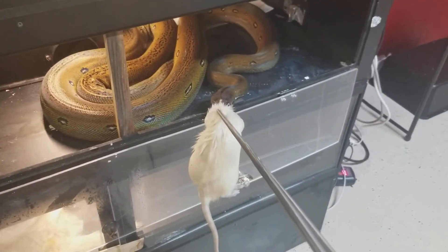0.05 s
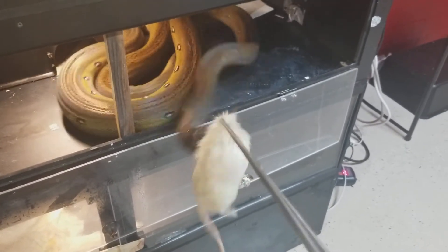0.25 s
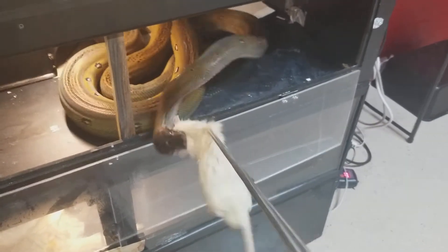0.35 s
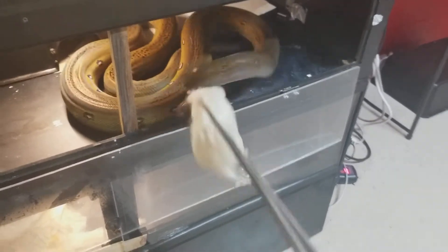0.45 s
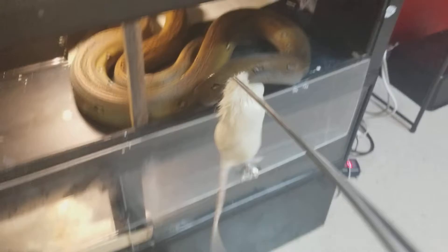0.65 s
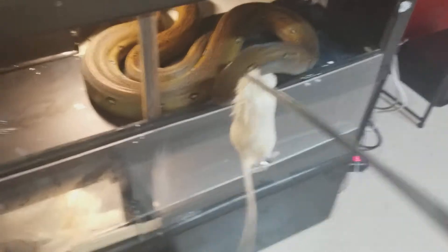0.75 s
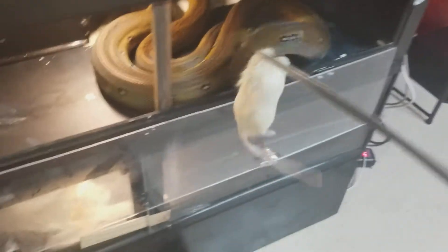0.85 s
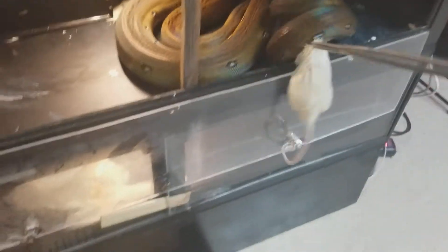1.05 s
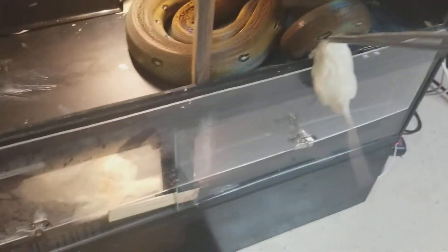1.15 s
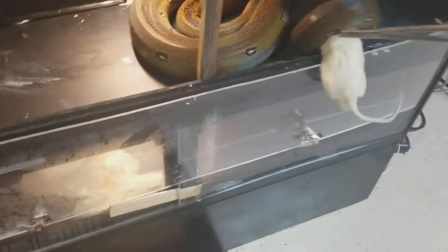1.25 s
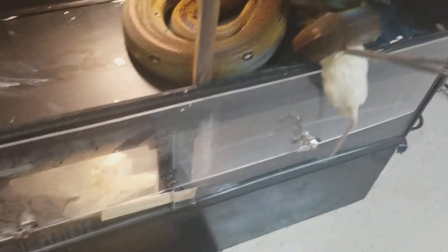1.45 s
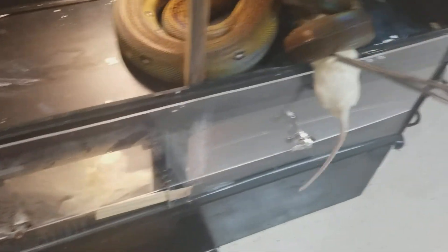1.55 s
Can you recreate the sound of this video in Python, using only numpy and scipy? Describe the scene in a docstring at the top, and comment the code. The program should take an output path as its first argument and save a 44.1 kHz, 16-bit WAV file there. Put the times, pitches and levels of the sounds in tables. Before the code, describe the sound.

A large snake strikes with a snap, then thumps against its enclosure and drags its coils.

```python
"""A python lunges at food held on steel tongs, in a small hard-walled room with a low ventilation rush.
First a swish swells and ends in the snap of its jaws. Its body then hits the panels of its enclosure:
two loud thumps among softer bumps. Meanwhile its coils drag over the floor, and its skin squeaks once.
As the dragging fades, the tongs scrape off the scales and click shut. Last comes a soft tap close by."""
import sys
import numpy as np
from scipy import signal
from scipy.fft import rfft, irfft, next_fast_len
from scipy.io import wavfile

SR = 44100
rng = np.random.default_rng(int(sys.argv[2]) if len(sys.argv) > 2 else 0)


def digitize_waveform(pressure):
    """Quantize a signal to 16-bit integers and store it at the path in sys.argv[1].

    Rows of a 2-D input are taken as channels; values are limited to [-1, 1].
    """
    field = np.atleast_2d(pressure).T
    bounded = np.clip(field, -1, 1)
    quanta = np.round(bounded * 32767).astype(np.int16)
    wavfile.write(sys.argv[1], SR, quanta)


N = 70560

# tones the enclosure panels ring at (pitch [Hz], level [dB], time to fade by 60 dB [s])
PANEL_TONES = [(72.8, -19, 0.43), (135.3, -0.5, 0.35), (166, -6, 0.14), (224.8, -7.5, 0.24), (275, 1, 0.14),
               (352, -4, .2), (384.2, -15.5, 0.41), (462, 0.5, 0.12), (538.3, -14, 0.4), (591, -12.5, .16),
               (773, -6, 0.24), (1124, -10, 0.084)]
# how long the room echoes (frequency [Hz], time to fade by 60 dB [s])
ECHO_TIMES = [(150, 0.7), (800, 0.21), (2500, 0.23), (6000, 0.32), (14000, 0.26)]
DIRECT_DB = 0.5  # gain of the sound that arrives ahead of its echo


def amp(db):
    """Turn decibels into a gain to multiply by."""
    return 10 ** (np.asarray(db) / 20)


def along(points, hz):
    """Read between (frequency, value) points on a logarithmic frequency scale."""
    frequencies, values = np.transpose(points)
    return np.interp(np.log(hz + 1), np.log(frequencies + 1), values)


def colour(points):
    """A tone colour: a gain for any frequency, from (frequency [Hz], level [dB]) points."""
    return lambda hz: amp(along(points, hz))


def resonance(centre_hz, width_hz):
    """A tone colour with a single peak."""
    return lambda hz: 1 / (1 + ((hz - centre_hz) / width_hz) ** 2)


def level(points):
    """A gain for each sample, from (time [s], level [dB]) points."""
    return amp(np.interp(np.arange(N) / SR, *np.transpose(points)))


def since(start_s):
    """Seconds since a moment, zero before it."""
    return np.maximum(np.arange(N) / SR - start_s, 0)


def fade(t, fade_s):
    """Start suddenly, then fall by 60 dB every fade_s seconds."""
    return (t > 0) * np.exp(-np.log(1000) * t / fade_s)


def pan(db):
    """Two gains that make the left side db decibels louder than the right."""
    return amp(np.array([[db], [-db]]) / 2)


def filtered(sound, gain):
    """Turn each frequency of a sound up or down by its gain."""
    size = next_fast_len(N + SR // 2)
    return irfft(rfft(sound, size) * gain(np.fft.rfftfreq(size, 1 / SR)), size)[..., :N]


def spread(pair, gain):
    """Mix two unrelated signals into coloured stereo of strength 1, with the bass near the middle."""
    # how alike left and right are (frequency [Hz], likeness [0 to 1])
    likeness = [(100, 0.96), (250, 0.89), (500, 0.78), (1000, 0.072), (2000, 0.19), (5000, 0), (12000, 0)]
    angle = lambda hz: np.arccos(along(likeness, hz)) / 2
    mid, side = filtered(pair, lambda hz: gain(hz) * np.array([np.cos(angle(hz)), np.sin(angle(hz))]))
    stereo = np.array([mid + side, mid - side])
    return stereo / np.sqrt(np.mean(stereo ** 2) + 1e-20)


def noise(gain):
    """Stereo noise with the given tone colour."""
    return spread(rng.standard_normal((2, N)), gain)


def room(sound, echo_db):
    """A sound plus its echo off the hard walls, each frequency dying at its own speed."""
    hz, t, bands = signal.stft(noise(np.ones_like)[:, :SR // 2], SR, nperseg=256)
    dying = fade(t + 1e-9, along(ECHO_TIMES, hz)[:, None])
    tail = signal.istft(bands * dying, SR, nperseg=256)[1]
    tail *= np.arange(tail.shape[1]) / SR > 0.0022  # the echo starts a moment late
    tail /= np.linalg.norm(tail, axis=1, keepdims=True)
    echo = signal.fftconvolve(np.atleast_2d(sound)[:1], tail, axes=1)[:, :N]
    return amp(DIRECT_DB) * sound + amp(echo_db) * echo


def burst(gain, start_s, fade_s, echo_db):
    """A short noisy contact, and the room echo that builds up as it gives off its energy."""
    t = since(start_s)
    contact = fade(t, fade_s) * (1 - np.exp(-t / 0.00086))  # rises in about a millisecond
    hz, frame_s, bands = signal.stft(noise(gain), SR, nperseg=256)
    echo_s = along(ECHO_TIMES, hz)[:, None]
    dying = np.sqrt(fade_s / echo_s) * fade(np.abs(frame_s - start_s) + 1e-9, echo_s)
    tail = signal.istft(bands * dying, SR, nperseg=256)[1][:, :N]
    build_up = np.sqrt(np.cumsum(contact ** 2) / np.sum(contact ** 2))
    return amp(DIRECT_DB) * contact * noise(gain) + amp(echo_db) * build_up * tail


def ring(tones, t, rise_cycles=1.8):
    """A struck object rings: each tone takes a few cycles to build up, then dies away."""
    sound = np.zeros(N)
    for k, (hz, db, fade_s) in enumerate(tones):
        gain = (-1) ** k * amp(db - 1.5 * rng.standard_normal())  # every other tone is flipped
        rise = 1 - np.exp(-t * hz / rise_cycles)
        sound += gain * rise * fade(t, fade_s) * np.sin(2 * np.pi * hz * t)
    return sound


def ventilation():
    """Moving air makes a steady low rush."""
    # colour of the rush (frequency [Hz], level [dB])
    air_colour = [(25, -15), (65, -3), (105, -10.5), (140, -1), (280, -0.5), (380, -3.5), (460, -1.5),
                  (630, -15.5), (1000, -22), (2400, -31), (7000, -44), (9000, -51), (11500, -44.5),
                  (15500, -32)]
    return amp(-56.5) * noise(colour(air_colour))


def tap(start_s=1.4483, pitch_hz=634, reflection_delay_s=0.0046):
    """Something taps softly close by, and the sound bounces once off a near surface."""
    pulse = lambda t: np.sin(2 * np.pi * pitch_hz * t) * fade(t, fade_s=0.0035)
    reflection = amp(-10) * pulse(since(start_s + reflection_delay_s))
    return amp(-32.5) * (pulse(since(start_s)) + reflection) * pan(-5)


def tongs_scrape():
    """The tongs slip off the scales with a brief bright scrape."""
    # colour of steel sliding on scales (frequency [Hz], level [dB])
    scrape_colour = [(200, -10), (750, 3.5), (1300, -14), (2300, -6), (5300, -5.5), (7200, 5.5), (8800, -2),
                     (11200, 6.5), (12500, -10), (15500, -7)]
    return amp(-46.5) * burst(colour(scrape_colour), start_s=1.199, fade_s=0.16, echo_db=2.5) * pan(4)


def tongs_click(start_s=1.3802):
    """The tips meet with a sharp tick and a clack that rings the steel arms."""
    # colour of the tips meeting (frequency [Hz], level [dB])
    clack_colour = [(900, -17), (1400, -2), (2600, 0), (5000, 0), (7000, -10.5), (15000, -23)]
    # tones of the steel arms (pitch [Hz], level [dB], time to fade by 60 dB [s])
    steel_tones = [(1498, -2.5, 0.057), (2550, 0, 0.061), (3187, -5, 0.072), (4176, 1, 0.036),
                   (5000, -6, 0.054)]
    clack = amp(-47.5) * burst(colour(clack_colour), start_s, fade_s=0.042, echo_db=1)
    tick = amp(-39) * burst(resonance(centre_hz=10430, width_hz=730), start_s, fade_s=0.0074, echo_db=-9)
    arms = amp(-54.5) * room(ring(steel_tones, since(start_s), rise_cycles=2.4), echo_db=1)
    return (clack + tick + arms) * pan(4)


def skin_squeak(peak_s=0.858, rise_s=0.024, fall_s=0.0079):
    """Skin rubs on a panel: a rough squeak swells, then lets go."""
    t = np.arange(N) / SR - peak_s
    swell = np.exp(-np.abs(t) / np.where(t < 0, rise_s, fall_s))
    return amp(-47) * swell * noise(resonance(centre_hz=1250, width_hz=110))


def sliding_scales(colour_points, slips_per_s=3000):
    """Scales slide in many tiny slips of uneven size."""
    slips = (rng.random((2, N)) < slips_per_s / SR) * rng.standard_normal((2, N))
    unevenness = amp(2.5 * rng.standard_normal((2, N)))
    return spread(slips * unevenness, colour(colour_points))


def coils():
    """The body rasps, hisses and squeaks as it slides, while its weight rumbles in the panels."""
    # scales dragging on the floor (time [s], level [dB])
    drag_levels = [(.2, -98), (.222, -45), (.28, -49.5), (.33, -56.5), (.44, -65), (.48, -57), (.56, -58.5),
                   (.62, -53.5), (.7, -59.5), (.73, -48), (.79, -62.5), (.86, -54.5), (.98, -54.5),
                   (1.07, -67), (1.36, -73), (1.47, -65), (1.6, -67)]
    # colour of the dragging (frequency [Hz], level [dB])
    drag_colour = [(200, 5), (500, 9.5), (800, 9.5), (1300, 7), (1700, 5), (2400, 8.5), (3500, 1),
                   (5000, 0.5), (7000, -46), (9000, -25), (15000, -16)]
    drag = level(drag_levels) * sliding_scales(drag_colour)
    # fine hiss of the scales (time [s], level [dB])
    hiss_levels = [(.19, -80), (.222, -43.5), (.3, -55), (.42, -67), (.66, -67), (.705, -59.5), (.725, -51),
                   (.79, -67.5), (.835, -62), (.85, -52), (.89, -59), (.925, -52.5), (1.02, -63),
                   (1.17, -66), (1.35, -73.5), (1.5, -70.5), (1.6, -72)]
    # colour of the hiss (frequency [Hz], level [dB])
    hiss_colour = [(1000, -30), (4000, -2.5), (7200, -1), (9000, -6), (11500, 1.5), (13000, -9.5),
                   (15500, -12)]
    hiss = level(hiss_levels) * sliding_scales(hiss_colour)
    rubbing = room(drag + hiss, echo_db=0) + skin_squeak()
    # weight shifting on the panels (time [s], level [dB])
    rumble_levels = [(.12, -73), (.23, -45.5), (.27, -36.5), (.295, -41), (.4, -36.5), (.47, -47.5),
                     (.53, -36), (.62, -55), (.68, -45.5), (.73, -48), (.78, -42.5), (.83, -48),
                     (1.04, -52.5), (1.12, -58), (1.35, -75.5), (1.52, -65), (1.6, -87)]
    # colour of the rumble (frequency [Hz], level [dB])
    rumble_colour = [(20, -36.5), (45, -7), (78, 5), (105, -5), (140, -3.5), (190, -14.5), (300, -7),
                     (450, -17), (700, -41.5), (2000, -54)]
    rumble = level(rumble_levels) * noise(colour(rumble_colour))
    return rubbing * pan(3.5) + rumble


def body_blows():
    """Each blow is a slap of skin and a thump of the panels, some duller, some brighter."""
    # the body hitting the enclosure (time [s], thump level [dB], thump dull above [Hz],
    # slap level [dB], slap dull above [Hz], slap time to fade by 60 dB [s], slap left over right [dB])
    blows = [(0.277, -41, 100, -58, 5000, 0.015, 5), (0.29, -32, 160, -47.5, 13000, 0.0095, 6),
             (0.3402, -25, 450, -33, 5340, 0.064, 0), (0.37, -46, 130, -44.5, 4000, 0.049, 17.5),
             (0.454, -52, 150, -37.5, 6400, 0.021, 0), (.503, -26, 110, -30.5, 6930, 0.062, 1),
             (0.595, -54, 204, -51, 6000, 0.014, 0), (0.642, -56, 507, -39, 5560, 0.035, -3),
             (.668, -44, 80, -55, 3000, 0.035, 2), (.74, -43, 130, -44.5, 5060, .05, -7),
             (.757, -34, 101, -70, 4000, 0.017, 2), (0.848, -48, 150, -43, 10300, 0.04, -4),
             (.975, -47, 150, -43, 4040, 0.037, -0.5)]
    # colour of a slap (frequency [Hz], level [dB])
    slap_colour = [(100, -24), (260, 3), (480, 8.5), (800, 2), (1100, 1), (1700, -1), (2400, -2),
                   (4000, -2.5), (6500, -1.5), (9000, -9.5), (11500, -0.5), (13000, -19), (15500, -23)]
    slaps, thumps = np.zeros((2, N)), np.zeros(N)
    for start_s, thump_db, thump_dull_hz, slap_db, slap_dull_hz, slap_s, pan_db in blows:
        skin = lambda hz: amp(along(slap_colour, hz)) / np.sqrt(1 + (hz / slap_dull_hz) ** 6)
        slaps += amp(slap_db) * burst(skin, start_s, slap_s, echo_db=4.5) * pan(pan_db)
        dulled_tones = [(hz, db - 10 * np.log10(1 + (hz / thump_dull_hz) ** 4), fade_s)
                        for hz, db, fade_s in PANEL_TONES]
        thumps += amp(thump_db) * ring(dulled_tones, since(start_s))
    return slaps + room(thumps, echo_db=-12)


def strike(lunge_s=0.18, snap_s=0.2232, snap_fade_s=0.081, rise_db_per_s=224, ring_above_hz=440):
    """The lunge swishes louder until the jaws crack and snap, ringing the higher tones of the panels."""
    # colour of the jaws closing (frequency [Hz], level [dB])
    jaw_colour = [(80, -9), (280, 4), (480, 9.5), (800, 9), (1400, -7), (2300, 5), (4500, -4.5),
                  (7500, 8.5), (9800, -5), (11700, 3.5), (13500, -10), (15500, -15)]
    # colour of the lunge's swish (frequency [Hz], level [dB])
    swish_colour = [(200, -8), (900, -8), (1600, -3), (2500, 5.5), (3600, -12.5), (7000, -16), (15000, -27)]
    crack = amp(-30.5) * burst(colour(jaw_colour), snap_s, fade_s=0.0064, echo_db=2)
    snap = amp(-30) * burst(colour(jaw_colour), snap_s, snap_fade_s, echo_db=-0.5)
    after_lunge, after_snap = since(lunge_s), since(snap_s)
    high_tones = [(hz, db - 10 * np.log10(1 + (ring_above_hz / hz) ** 8), fade_s)
                  for hz, db, fade_s in PANEL_TONES]
    hollow_ring = amp(-32.5) * ring(high_tones, after_snap)
    swell = (after_lunge > 0) * amp(-58.5 + rise_db_per_s * (after_lunge - after_snap))
    swish = swell * fade(after_snap + 1e-9, snap_fade_s) * noise(colour(swish_colour))
    return (swish + crack + snap + hollow_ring) * pan(0.5)


def scene():
    """The snake, the tongs and the tap, over the ventilation."""
    return strike() + body_blows() + coils() + tongs_scrape() + tongs_click() + tap() + ventilation()


def record(dry):
    """Cut off the very highest treble."""
    return filtered(dry, lambda hz: hz < 15850)


dry = scene()
out = record(dry)
digitize_waveform(out)
```